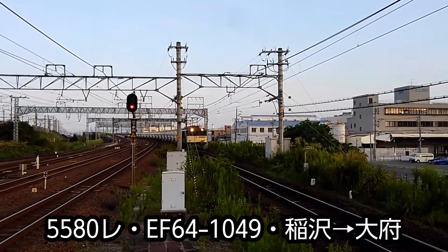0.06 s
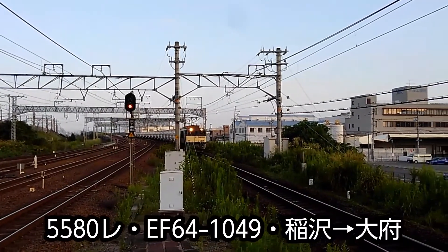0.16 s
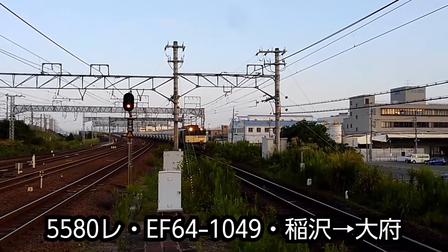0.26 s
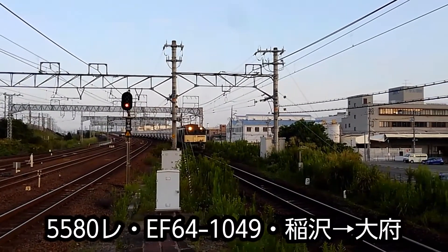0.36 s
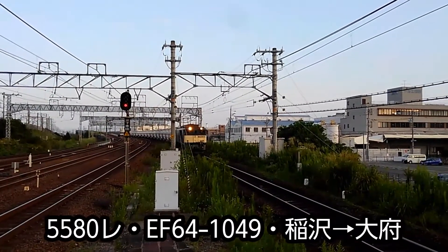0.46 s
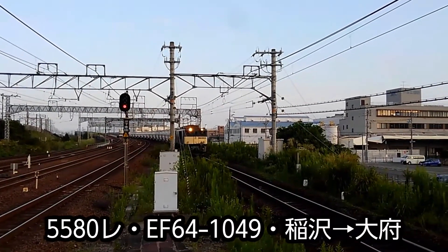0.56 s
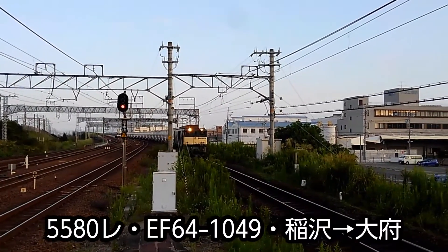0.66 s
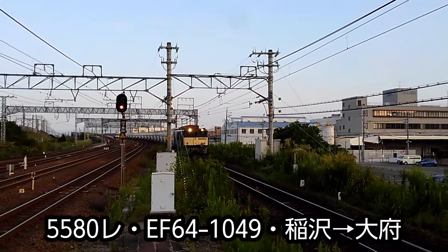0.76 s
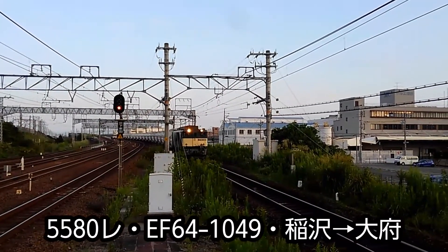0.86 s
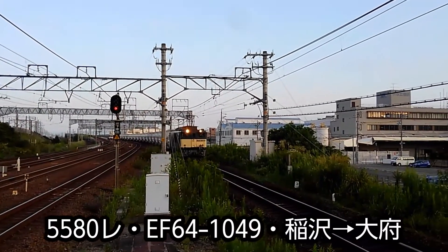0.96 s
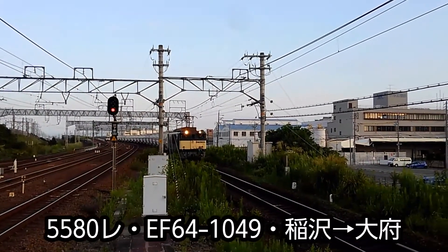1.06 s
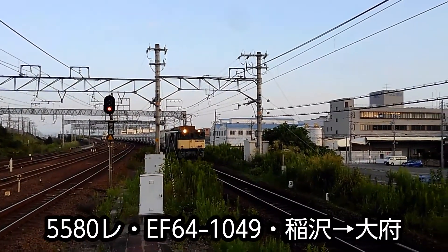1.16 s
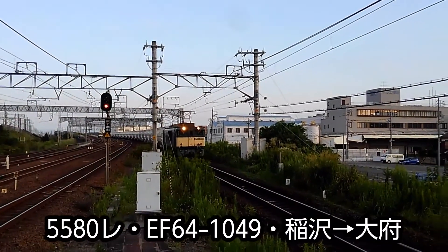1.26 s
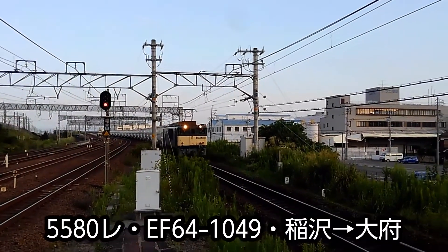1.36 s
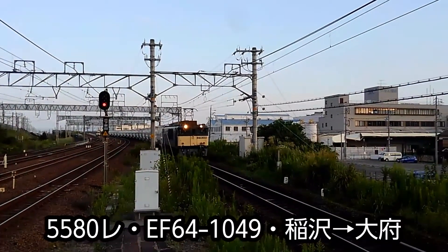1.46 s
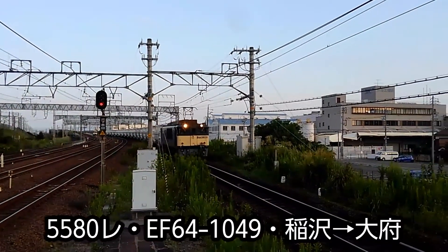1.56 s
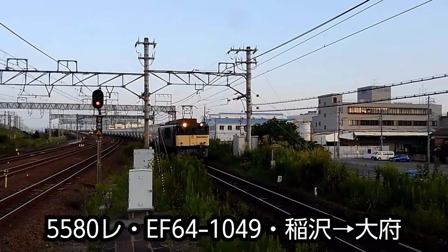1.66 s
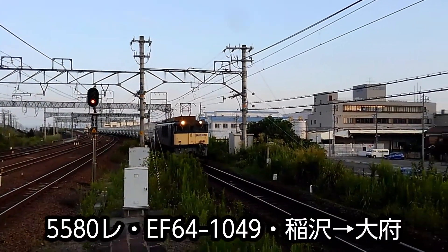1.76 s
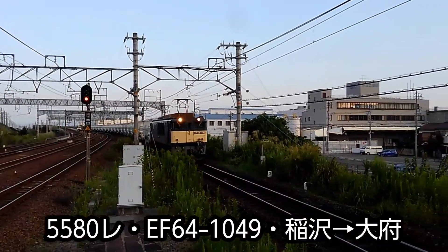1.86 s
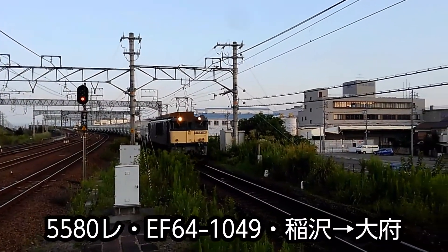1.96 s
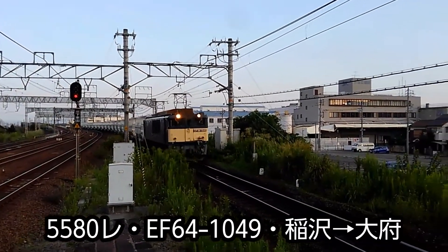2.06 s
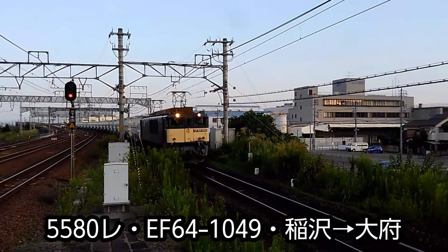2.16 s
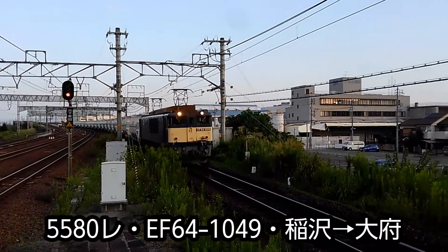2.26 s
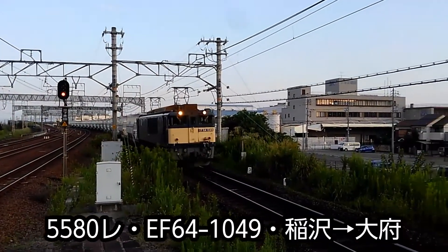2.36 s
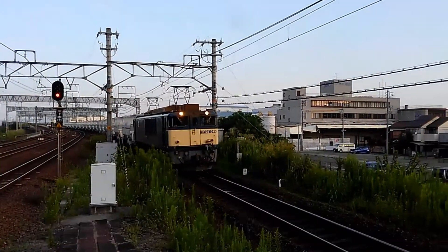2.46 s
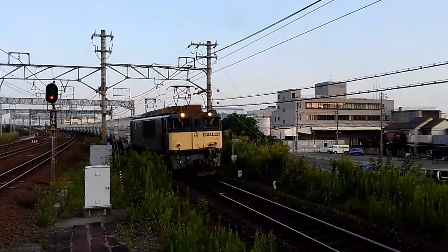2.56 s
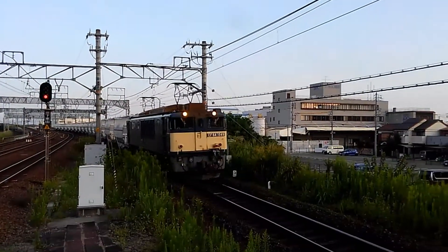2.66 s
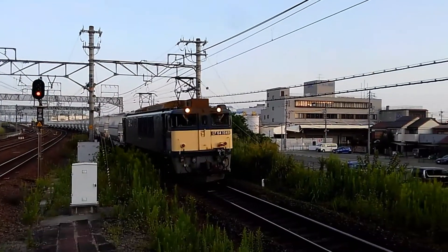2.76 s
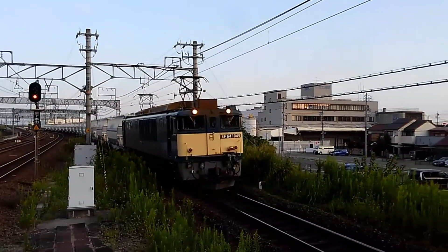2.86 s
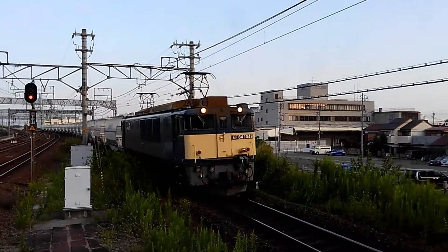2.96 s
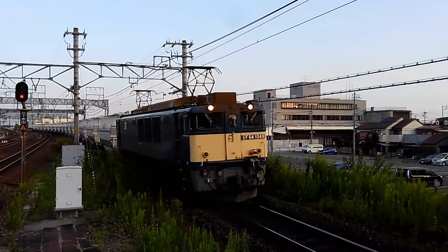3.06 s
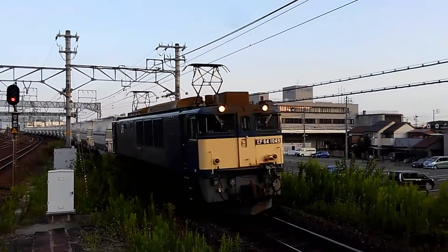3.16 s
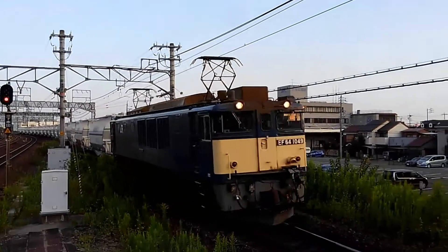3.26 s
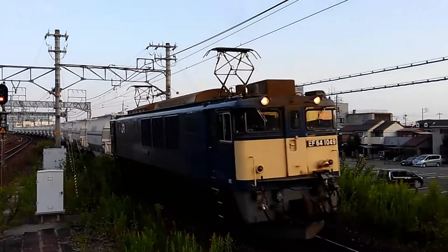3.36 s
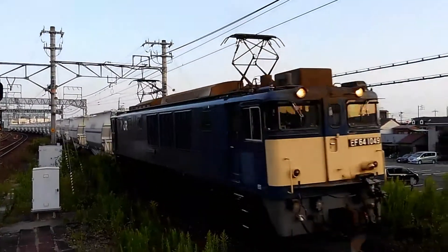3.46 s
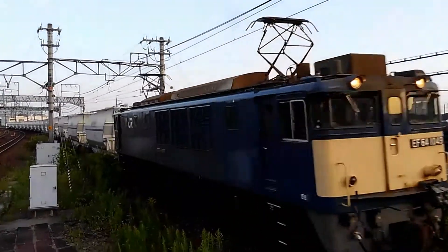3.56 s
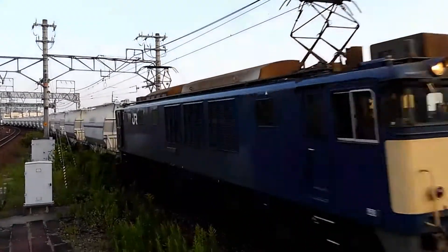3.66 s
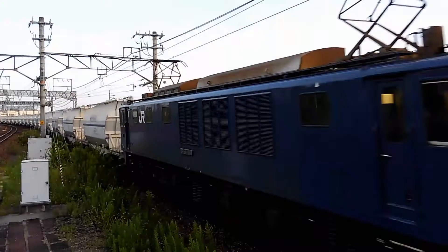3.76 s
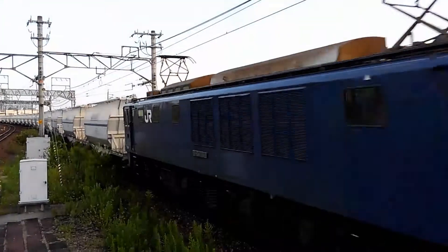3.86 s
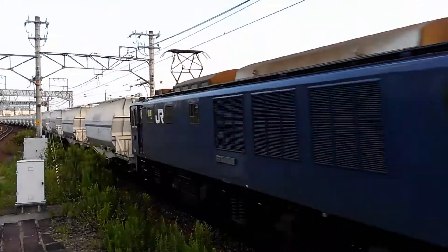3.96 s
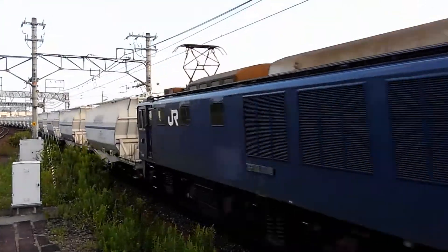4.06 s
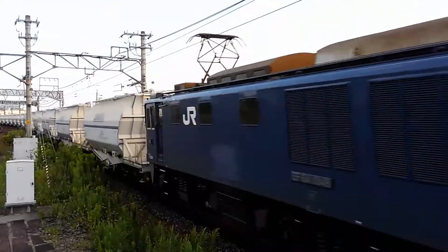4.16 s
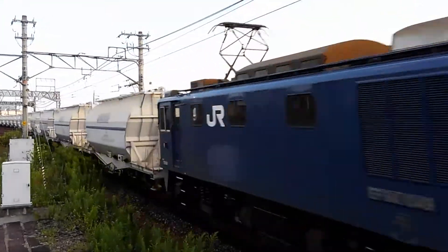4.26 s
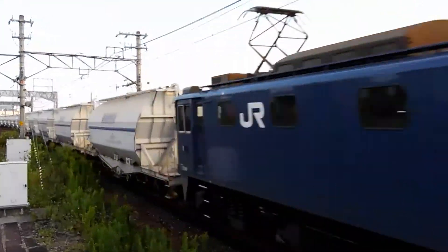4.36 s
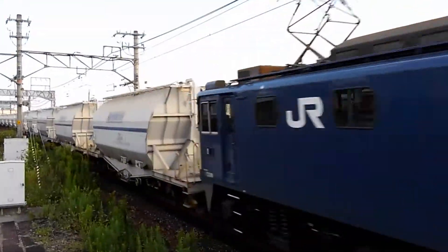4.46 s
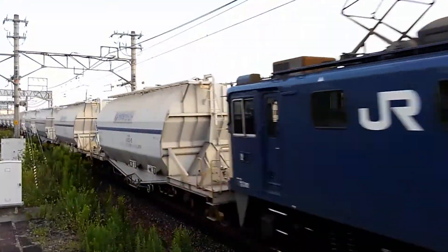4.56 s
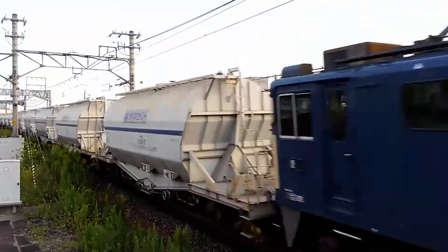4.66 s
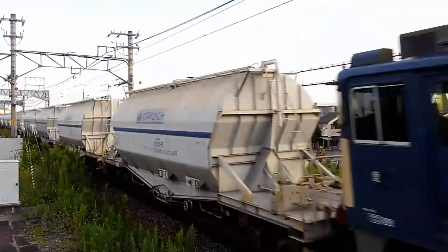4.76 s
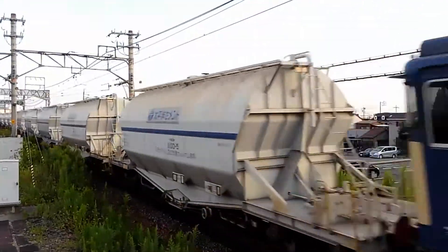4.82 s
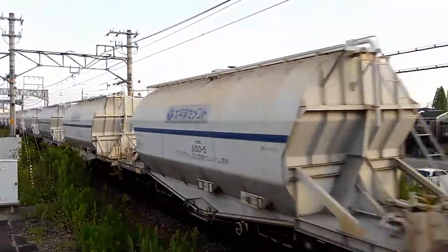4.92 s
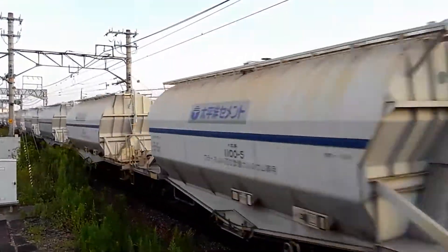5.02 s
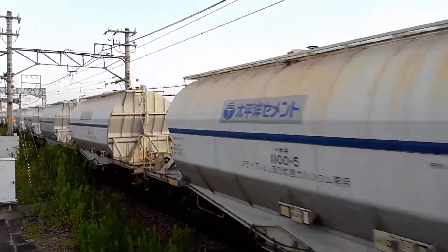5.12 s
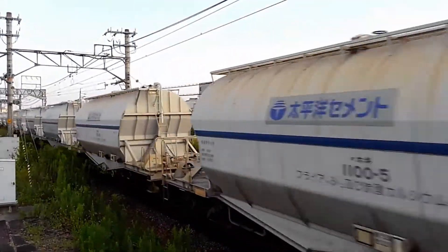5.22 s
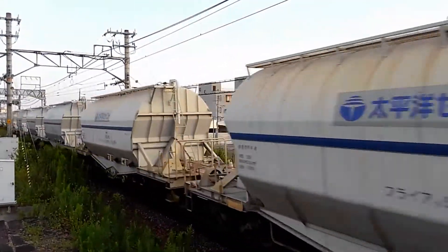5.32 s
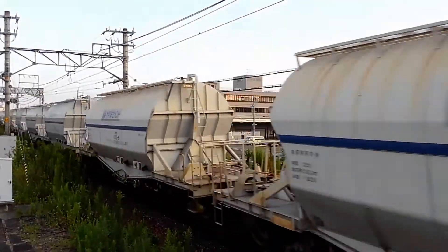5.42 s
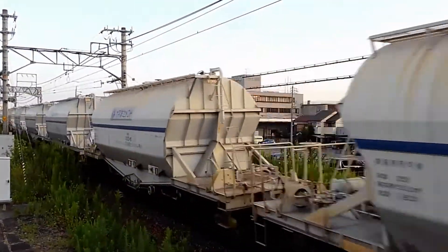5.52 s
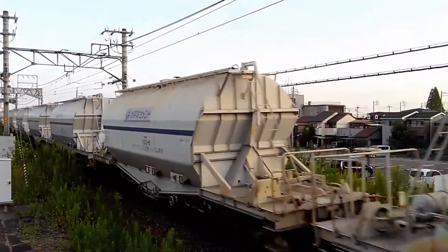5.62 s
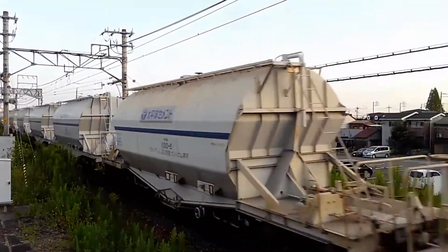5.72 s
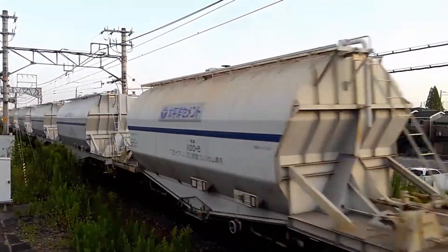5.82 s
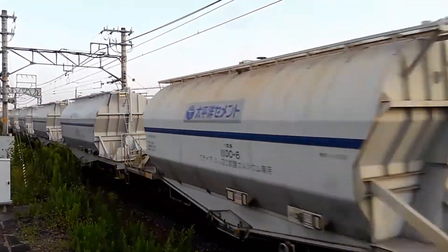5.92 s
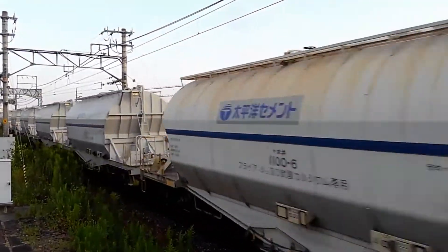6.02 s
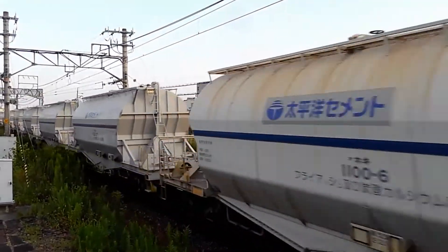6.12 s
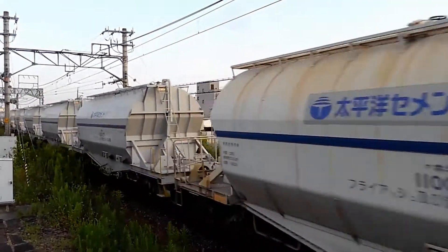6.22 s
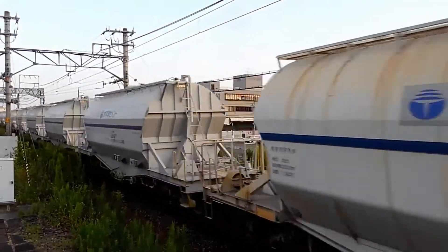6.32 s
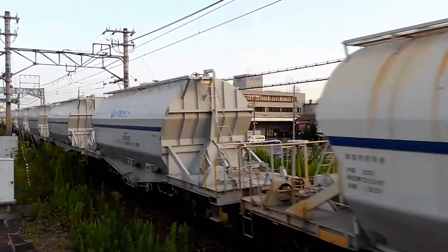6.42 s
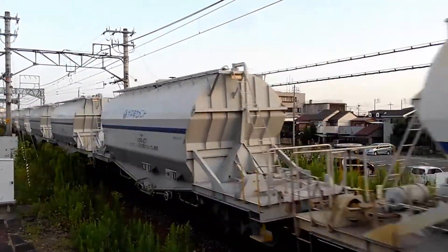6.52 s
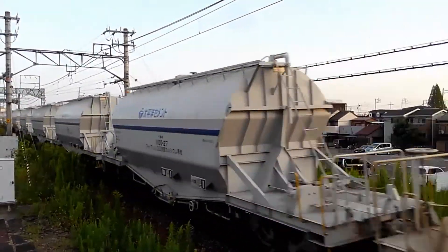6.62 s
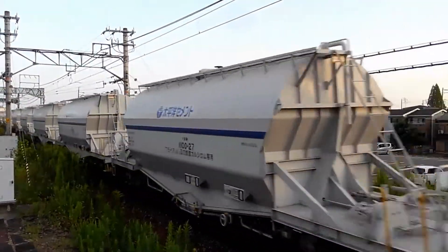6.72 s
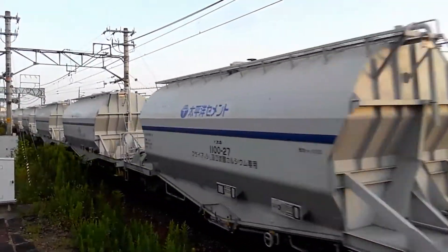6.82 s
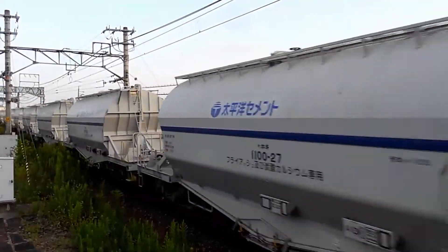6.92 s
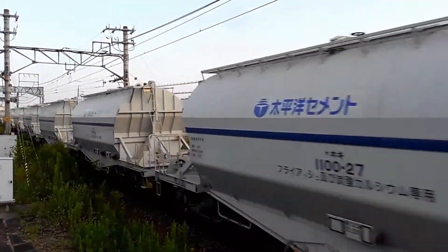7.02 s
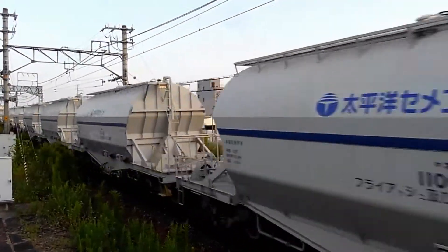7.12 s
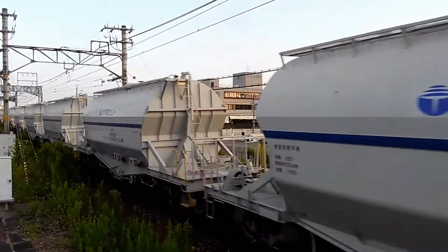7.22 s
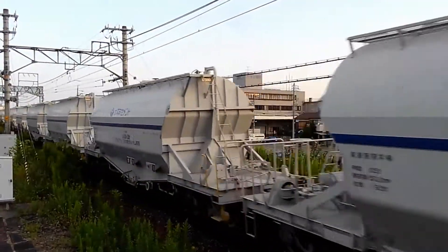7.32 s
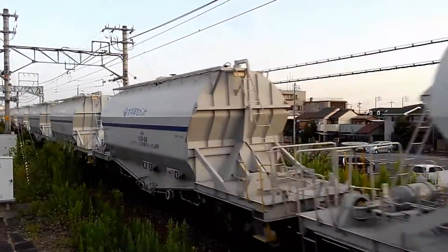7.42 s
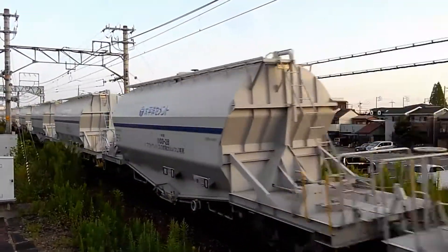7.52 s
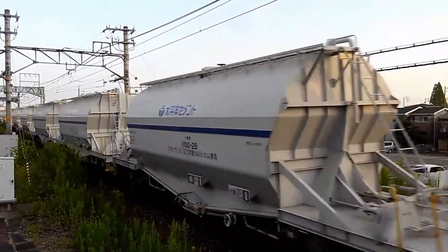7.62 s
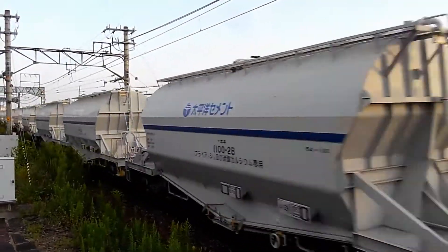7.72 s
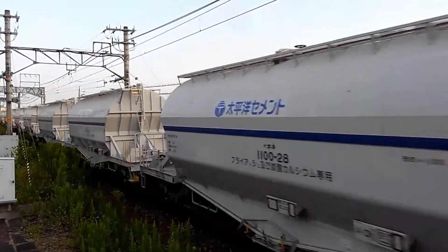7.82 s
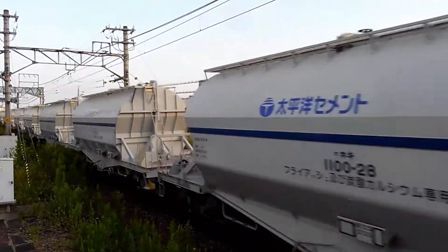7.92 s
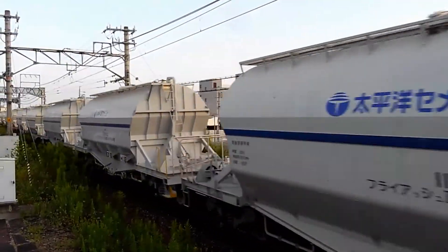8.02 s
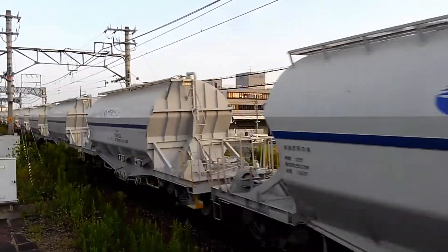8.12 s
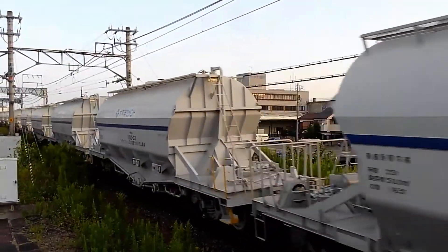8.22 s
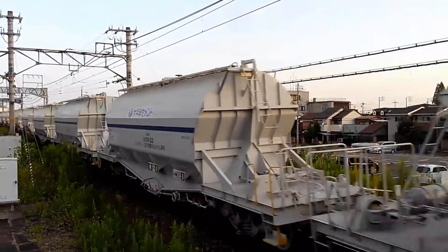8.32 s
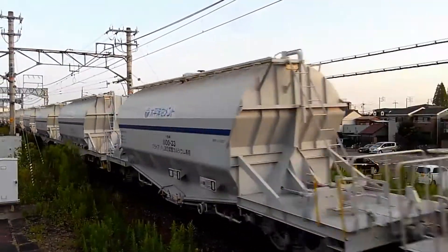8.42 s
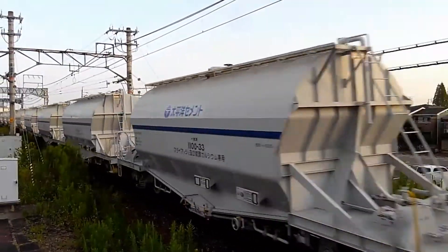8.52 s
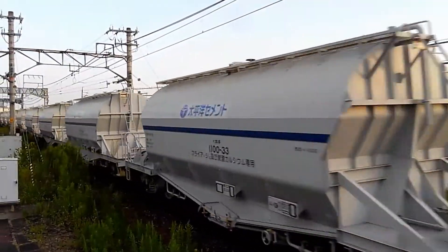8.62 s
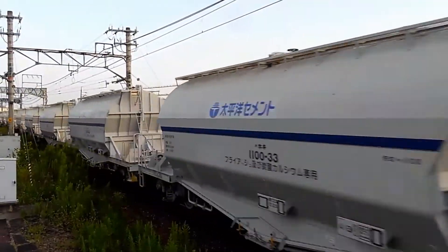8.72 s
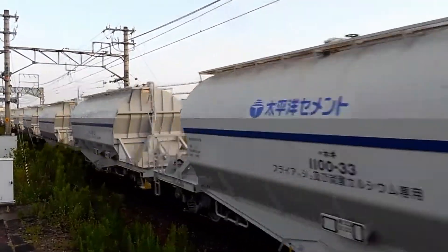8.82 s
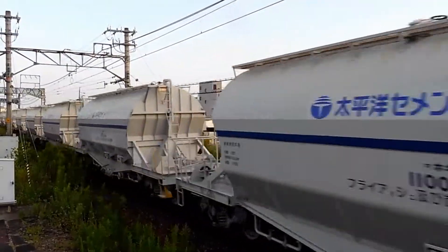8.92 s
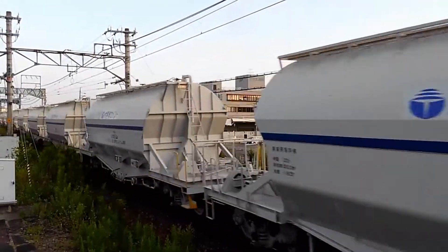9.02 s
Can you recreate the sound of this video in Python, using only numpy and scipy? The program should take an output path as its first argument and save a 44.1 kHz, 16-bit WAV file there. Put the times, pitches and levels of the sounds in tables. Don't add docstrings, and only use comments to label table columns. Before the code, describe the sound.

From near quiet, a humming electric locomotive rushes past the platform, followed by heavy freight wagons rumbling, knocking over a joint and buffeting the microphone.

```python
import sys
import numpy as np
from scipy import signal
from scipy.fft import rfft, irfft, next_fast_len
from scipy.io import wavfile
from scipy.ndimage import uniform_filter1d, map_coordinates

SR = 44100
rng = np.random.default_rng(int(sys.argv[2]) if len(sys.argv) > 2 else 0)


def file_out(sig):
    cols = np.atleast_2d(sig).T
    lim = np.clip(cols, -1, 1)
    pcm = np.round(lim * 32767).astype(np.int16)
    wavfile.write(sys.argv[1], SR, pcm)


def invert_db(x):
    u = np.asarray(x, float) / 20
    return 10 ** u


N = 400569
TIME = np.arange(N) / SR
SPEED = 15.5

# [crest t/s, peak level/dB, f/Hz]
JOINT_BLOWS = [(6.087, -21, 200), (6.116, -12.5, 190), (6.158, -19, 200), (6.775, -19, 170),
               (6.924, -15.5, 200), (7.025, -11.5, 185), (7.206, -22, 210), (7.593, -21, 207),
               (7.929, -14, 185), (8.735, -21, 194), (8.829, -14, 185), (8.934, -19, 230)]
# [trough t/s, level/dB, sag length/s, bulge before (0-1), ring f/Hz]
PRESSURE_THUMPS = [
    (6.369, -7, .004, .15, 28),
    (8.937, -10.5, .004, .7, 28),
]


def unit(x):
    return x / np.sqrt(np.mean(x ** 2) + 1e-20)


def curves(rows, t):
    s, *cols = np.transpose(rows)
    return [np.interp(t, s, c) for c in cols]


def along(points, hz):
    f, db = np.transpose(points)
    return np.interp(np.log(hz + 1), np.log(f), db)


def wobble(rate):
    return map_coordinates(rng.standard_normal(int(N * rate / SR) + 4), [TIME * rate])


def band(x, lo_hz, hi_hz):
    return signal.sosfilt(signal.butter(2, [lo_hz, hi_hz], "band", fs=SR, output="sos"), x)


def hiss(lo_hz, hi_hz):
    return unit(band(rng.standard_normal(N), lo_hz, hi_hz))


def bell(t, centre_s, length_s):
    return np.exp(-.5 * ((t - centre_s) / length_s) ** 2)


def bumps(rows, t):
    return sum(db * bell(t, s, d) for s, db, d in rows)


def swells(rows):
    return sum(invert_db(db) * bell(TIME, s, d) for s, db, d in rows)


def spread(along_m, metres, loss_db):
    return -loss_db * np.log10(np.hypot(along_m / metres, 1))


def insect():
    # [t/s, level/dB, length/s]
    chirps = [
        (.25, -87, .08),
        (.7, -78, .09),
        (.98, -83, .06),
        (1.28, -82, .04),
        (1.47, -79, .09),
        (2.05, -80, .05),
        (2.6, -78, .06),
        (2.8, -79, .04),
    ]
    insect_hz = 3840
    return np.sqrt(2) * swells(chirps) * np.sin(2 * np.pi * insect_hz * TIME + .8 * wobble(20))


def housing_tick():
    spike = np.zeros(N)
    spike[round(.5674 * SR)] = invert_db(-22)
    return band(spike, 500, 3200) + .1 * band(spike, 5000, 8500) - .12 * band(spike, 11000, 14000)


def slipstream():
    out = np.zeros(N)
    for s, db, length, bulge, hz in PRESSURE_THUMPS:
        before = np.minimum(TIME - s, 0)
        after = np.maximum(TIME - s, 0)
        sag = bulge * np.exp(-((before + .015) / .007) ** 2)
        sag -= .6 * np.exp(before / length / 2) + .4 * np.exp(before / .0015)
        snap = np.exp(-after / (.0012 + .004 * bulge))
        ring = np.cos(2 * np.pi * hz * (after - .01 - .012 * bulge))
        back = .75 * (1 - snap) * np.exp(-after / .035) * ring
        out += invert_db(db) * np.where(TIME < s, sag, back - snap)
    return out


def wagon_puffs():
    # [t/s, level/dB, length/s]
    puffs = [
        (6.7, -65.5, .03),
        (7.21, -59.5, .03),
        (7.68, -55, 0.023),
        (7.86, -60, .02),
    ]
    return swells(puffs) * hiss(2500, 8950)


def flange_squeaks():
    # [t/s, level/dB, f/Hz, length/s]
    squeaks = [
        (6.89, -72, 10700, .03),
        (6.94, -70, 10700, .04),
        (7.28, -70, 10750, .04),
        (7.38, -70, 10850, .04),
    ]
    out = np.zeros(N)
    for s, db, hz, d in squeaks:
        envelope = np.exp(-((TIME - s - d / 2) / (d / 2)) ** 4)
        out += invert_db(db) * envelope * np.sin(2 * np.pi * hz * TIME + 1.5 * wobble(90))
    return out


def passing(t):
    # [distant town level/dB, locomotive abreast level/dB, its loss/dB per tenfold distance,
    #  wagon bogies abreast level/dB, their loss/dB per tenfold distance]
    layers = [
        (-49.5, -31, 15.5, -32, 16.6),
        (-55.5, -23.5, 26.5, -30.5, 22.8),
        (-55, -32.5, 25, -40.5, 26.7),
        (-87.5, -53.5, 24.5, -57, 29),
    ]
    # [t/s, level/dB, length/s]
    gusts = [(.96, 6, .04), (1.33, 3.5, 0.09), (1.6, -5, .08), (2.3, 4.5, .1), (2.63, -4, 0.054),
             (2.8, 3, 0.043), (2.95, 8, .04), (3.46, 5, 0.045), (4.2, 4.5, 0.05), (5.15, -2, 0.044),
             (5.47, 4.5, 0.039), (5.63, -6, .04), (6.42, 6, 0.072), (6.7, 3, 0.035), (7.68, -6, 0.046),
             (8.22, 4.5, .05), (8.75, 2.5, 0.035), (8.93, 11, .05)]
    loco_s, loco_m, half_m = 4.437, 5.5, 2.6
    coupling_s, wagon_s, axles_m = 5.107, 0.91, 5.38
    past_m = np.hypot(SPEED * (t - loco_s), half_m) - half_m
    bogies_m = SPEED * (t - coupling_s - wagon_s * np.arange(12)[:, None])
    power = []
    for town, loco, loss, wagon, fall in layers:
        engine = invert_db(2 * (loco + spread(past_m, loco_m, loss)))
        train = invert_db(2 * (wagon + spread(bogies_m, axles_m, fall))).sum(axis=0)
        power.append(invert_db(2 * town) + engine + train)
    power = np.array(power)
    power[0] *= invert_db(2 * bumps(gusts, t))
    return power


def colour(points, ring, hz):
    # [f/Hz, level/dB]
    port = [(4000, -6), (4600, -5), (5300, -1), (6000, 2), (8000, 0.5), (8700, -4), (9700, -6),
            (10800, -0.5), (12500, -3), (14300, -1.5)]
    humps = sum(top * np.exp(-.5 * ((hz - c) / w) ** 2) for c, w, top in ring)
    return along(points, hz) + humps + along(port, hz)


def rolling(patchy_db):
    edges_hz = (90, 560, 4500)
    # [f/Hz, level/dB per Hz]
    far = [(22, -1), (48, 4), (120, -13), (230, -8.5), (330, -15), (420, -23.5), (560, -26.5), (760, -25.5),
           (1100, -31), (1600, -34), (2400, -40), (3400, -43), (5000, -47), (14400, -56)]
    nearing = [(22, 10.5), (55, 10.5), (140, 4.5), (230, 10.5), (330, -1.5), (420, -7.5), (560, -16.5),
               (760, -11), (1100, -21.5), (1600, -25), (2400, -32.5), (3400, -41.5), (5000, -37),
               (14400, -47.5)]
    beside = [(22, 9.5), (55, 25.5), (140, 7.5), (230, 13.5), (330, 14), (420, 4), (560, 0), (760, 2),
              (1100, -10), (1600, -11.5), (2400, -16.5), (3400, -21.5), (5000, -32.5), (14400, -47.5)]
    wagons = [(22, 16), (55, 16.5), (140, 6), (230, 8.5), (330, -2.5), (420, -3), (560, -9.5), (760, -7.5),
              (1100, -15), (1600, -21), (2400, -23.5), (3400, -26), (5000, -37), (14400, -52.5)]
    # [f/Hz, width/Hz, level/dB]
    far_ring = [(44.6, 21, 10), (327, 14, 7.5), (471, 24, 10), (790, 173, 8.5), (1337, 85, 10.5),
                (2060, 200, 6), (2720, 300, 4)]
    nearing_ring = [(40, 29, 6.4), (323, 11, 8.5), (760, 170, 1.9), (1360, 79, 5.7), (2060, 180, 4.8),
                    (2900, 340, 6), (3860, 150, 0.78)]
    beside_ring = [(700, 41, 2.8), (950, 44, 4.2), (1370, 34, 3), (3180, 83, 5), (3850, 90, 4)]
    leaving_ring = [(700, 200, 4.1), (1306, 72, 10.7), (1890, 160, 3.9), (2800, 150, 5.1), (3750, 97, 1.7)]
    wagon_ring = [(832, 44, 3.7), (1420, 71, 8.8), (2064, 134, 5.3), (2846, 170, 8.1), (3860, 200, 2.5)]
    # [t/s, stage]
    stages = [
        (0, 2),
        (1.2, -1.5),
        (2.7, 1.5),
        (4.1, 2.5),
        (4.8, 2.5),
        (5.3, 3),
        (6.4, 3.5),
        (9.1, 4),
    ]
    pairs = [(far, far_ring), (nearing, nearing_ring), (beside, beside_ring),
             (wagons, leaving_ring), (wagons, wagon_ring)]
    hz, t, z = signal.stft(rng.standard_normal(N), SR, nperseg=2048, noverlap=1536)
    looks = np.array([colour(points, ring, hz) for points, ring in pairs])
    stage = np.clip(curves(stages, t)[0], 0, 4)
    weight = np.clip(1 - abs(stage - np.arange(5)[:, None]), 0, 1)
    power = invert_db(2 * looks.T @ weight)
    above = [1 / (1 + (edge / (hz + 1)) ** 8) for edge in edges_hz]
    shares = -np.diff([np.ones_like(hz), *above, np.zeros_like(hz)], axis=0)
    wanted = passing(t) * len(hz) / (shares @ power)
    field = uniform_filter1d(rng.standard_normal(z.shape), size=20, axis=0)
    field = uniform_filter1d(field, size=4, axis=1)
    gain = np.sqrt(power * (shares.T @ wanted)) * invert_db(patchy_db * unit(field))
    return signal.istft(z * gain, SR, nperseg=2048, noverlap=1536)[1][:N]


def lull():
    moments = [(s, .012, .45) for s, db, hz in JOINT_BLOWS if db > -17]
    moments += [(s + .008, .025, .8) for s, *_ in PRESSURE_THUMPS]
    return 1 - np.clip(sum(depth * bell(TIME, s, d) for s, d, depth in moments), 0, .9)


def rail_joint():
    out = np.zeros(N + SR)
    t = np.arange(SR // 8) / SR
    rise = .0105
    swell = (t / rise) ** 2 * np.exp(2 * (1 - t / rise))
    for s, db, hz in JOINT_BLOWS:
        turn = 2 * np.pi * hz * (t - rise)
        blow = .4 * np.exp(-((t - rise) / .003) ** 2) * np.cos(1.5 * turn)
        out[round((s - rise) * SR):][:len(t)] += invert_db(db - 2.5) * (swell * np.cos(turn) + blow)
    return out[:N]


def wheels():
    roll = rolling(patchy_db=0.81)
    low = signal.sosfiltfilt(signal.butter(2, 400, fs=SR, output="sos"), roll)
    return roll - (1 - lull()) * low + rail_joint()


def overhead_wire():
    # [t/s, level/dB]
    wire = [
        (0, -84),
        (2.2, -87),
        (2.35, -75),
        (3.4, -74),
        (4.2, -77),
        (5.2, -81),
        (9.1, -90),
    ]
    return invert_db(curves(wire, TIME)[0]) * hiss(10000, 16000)


def machine(partials_db, rest_hz, abreast_s, metres, size_m, loss_db, shade_db, fades, flutter_db, drift):
    along_m = SPEED * (TIME - abreast_s)
    path = np.hypot(along_m, metres)
    turns = rest_hz * (TIME - path / 343)
    level_db = spread(along_m, size_m, loss_db) - shade_db * np.maximum(TIME - abreast_s, 0)
    tone = np.zeros(N)
    for k, db in enumerate(partials_db, 1):
        phase = 2 * np.pi * k * turns + drift * np.sqrt(k) * np.cumsum(wobble(24.92)) * 25 / SR
        fade_db = bumps(fades, TIME) / k + flutter_db * np.sqrt(k) * wobble(8)
        tone += np.sqrt(2) * invert_db(db + level_db + fade_db) * np.sin(phase)
    return tone


def blower():
    blade_db = [-20, -35.5, -38]
    # [t/s, level/dB, length/s]
    echoes = [(.3, -3, 0.47), (2.545, -9.5, 0.4), (3.65, -2, 0.089), (3.983, -6, 0.046), (4.26, -11, 0.018),
              (4.38, -24, 0.016), (4.62, -4.5, 0.025), (4.798, -8, 0.043), (5.1, -4, 0.11),
              (5.4, -17, 0.085), (5.65, 4, .1)]
    return machine(blade_db, 237.2, 4.6, 5, size_m=5.5, loss_db=28, shade_db=2.45,
                   fades=echoes, flutter_db=1.5, drift=.25)


def bogie_gears():
    rear_db = [-36.5, -41.5]
    front_db = [-39]
    # [t/s, level/dB, length/s]
    rear_echoes = [
        (3.7, 5, .15),
        (4.82, 10, 0.041),
        (5.45, 3, 0.069),
    ]
    front_echoes = [
        (3.77, 15, 0.047),
        (4.18, 13, 0.052),
        (4.49, 5.8, .04),
        (5.03, 25, 0.033),
        (5.25, 10, 0.036),
    ]
    rear = machine(rear_db, 316.5, 5.1, 5.5, size_m=7, loss_db=25.7, shade_db=12.4,
                   fades=rear_echoes, flutter_db=1.5, drift=.2)
    front = machine(front_db, 316.5, 4.35, 7, size_m=5.5, loss_db=28.6, shade_db=9.8,
                    fades=front_echoes, flutter_db=2, drift=.3)
    return rear + front


def traction_motor():
    hum_db = [-31]
    # [t/s, level/dB, length/s]
    echoes = [
        (3.7, 7, .1),
        (4.1, 4, 0.062),
        (5.07, -10, .03),
        (5.2, 9, .05),
    ]
    return machine(hum_db, 179, 4.7, 4.5, size_m=6, loss_db=28.6, shade_db=10,
                   fades=echoes, flutter_db=2, drift=.3)


def locomotive():
    return blower() + bogie_gears() + traction_motor() + overhead_wire()


def scene():
    setting = insect() + housing_tick()
    air = slipstream() + wagon_puffs()
    train = flange_squeaks() + wheels() + locomotive()
    return (setting + air + train)[None]


def low_pass(x):
    return signal.sosfilt(signal.butter(12, 14980, fs=SR, output="sos"), x)


def record(dry):
    top_hz = 14300
    m = next_fast_len(N)
    passed = np.fft.rfftfreq(m, 1 / SR) < top_hz
    kept = irfft(rfft(dry, m) * passed, m)[:, :N]
    return low_pass(kept)


dry = scene()
out = record(dry)
file_out(out)
```